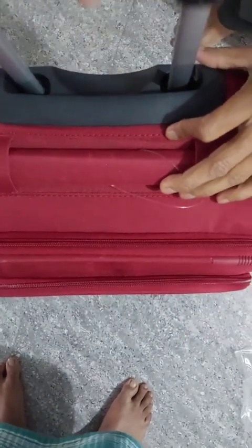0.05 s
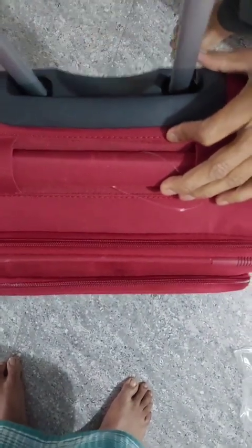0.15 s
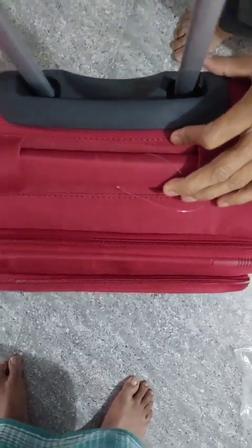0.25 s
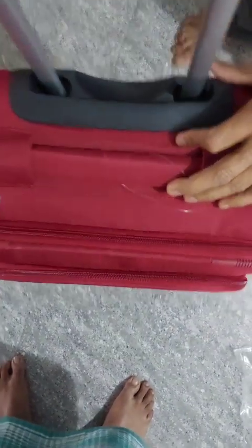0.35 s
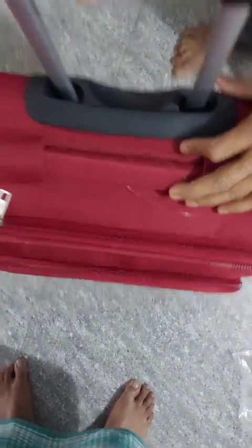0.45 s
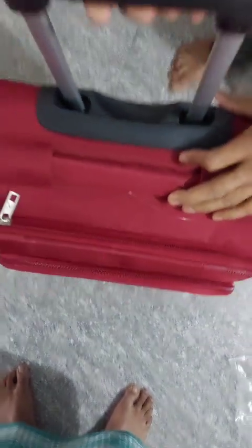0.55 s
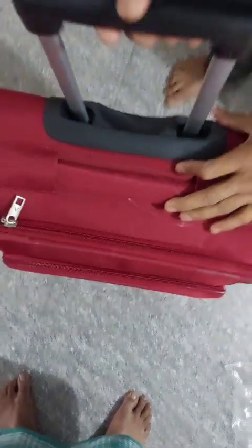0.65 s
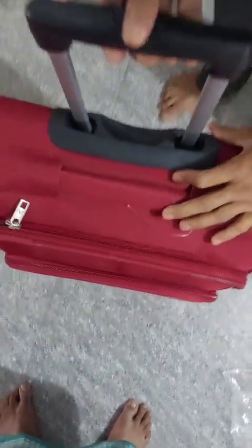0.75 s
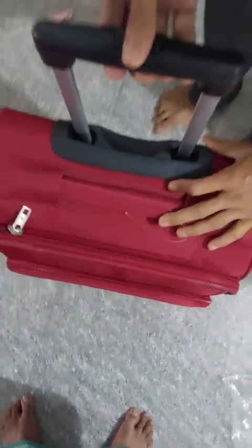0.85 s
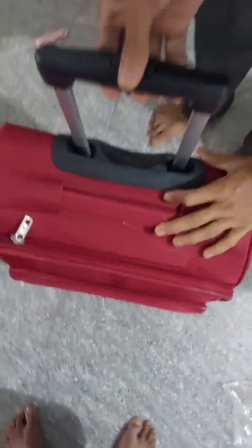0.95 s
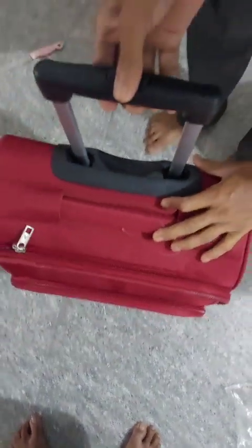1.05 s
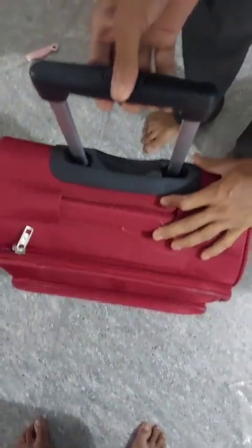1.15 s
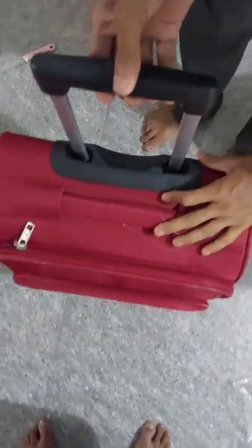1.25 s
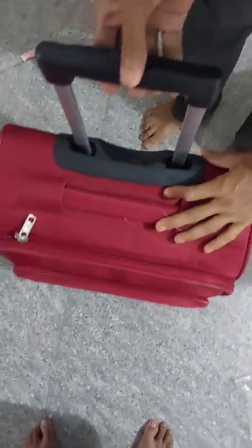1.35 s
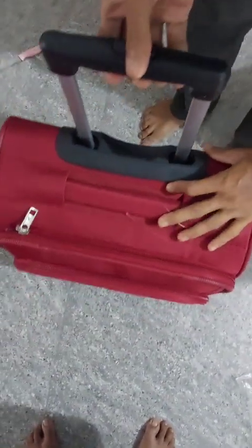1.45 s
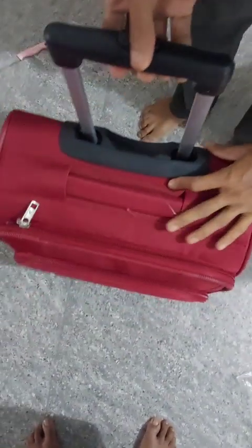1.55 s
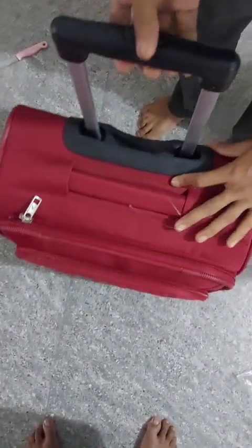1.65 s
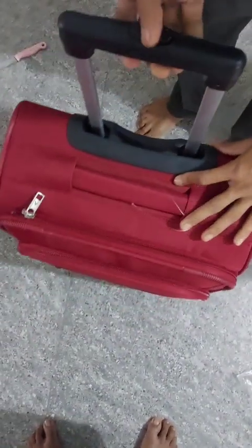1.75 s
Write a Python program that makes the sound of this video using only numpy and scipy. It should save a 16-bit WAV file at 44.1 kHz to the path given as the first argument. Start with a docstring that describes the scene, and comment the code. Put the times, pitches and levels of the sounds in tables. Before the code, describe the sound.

A suitcase's telescopic handle is pulled up with a loud metal clack and a locking snap.

```python
"""Suitcase handle pulled up

Close by in a small hard-floored room, the telescopic handle of a soft suitcase is drawn out.
The tubes grind, clack against their first stop and jolt the hollow case, then slide on
until the locking pins snap home. A zip pull tinkles and the fabric rustles as the case is tilted.
Every hit is a short noise crack with room echo; tubes, pins, shell and zip also ring."""
import sys
import numpy as np
from scipy import signal
from scipy.fft import rfft, irfft, next_fast_len
from scipy.io import wavfile
from scipy.ndimage import uniform_filter1d

SR = 44100
rng = np.random.default_rng(int(sys.argv[2]) if len(sys.argv) > 2 else 0)


def unload_wav(signal):
    """Save mono or channel-first audio to the path in sys.argv[1] as 16-bit WAV at rate SR, clipped to [-1, 1]."""
    wavfile.write(
        sys.argv[1],
        SR,
        np.round(np.clip(np.atleast_2d(signal).T, -1, 1) * 32767).astype(np.int16),
    )


N = 79380
TIME = np.arange(N) / SR
SIZE = next_fast_len(2 * N)
FREQS = np.maximum(np.arange(SIZE // 2 + 1) * SR / SIZE, 1)

# The hits. Each row: start in seconds, level in dB, brightness in dB per octave.
TUBE_HITS = [(0.001, -32, 0.5), (0.022, -47, 1), (0.108, -49, -2), (0.2128, -25, -0.5),
             (0.2173, -15, -0.06), (0.2215, -21.5, -1), (0.2315, -27, -1), (0.2432, -28.5, 0.5),
             (0.2472, -25, 2), (0.288, -59, 1.5)]  # tubes knocking in their guides
PANEL_HITS = [(0.005, -42.5, -1), (0.05, -46, -6.5), (0.36, -51.5, -9), (0.83, -43, 3), (1.19, -61, -7.5)]  # the back panel booming after the knocks
CASE_HITS = [(0.022, -48.5, -3), (0.231, -27.5, 2), (0.2455, -27.5, 2), (0.265, -38.5, -4.5),
             (0.318, -47.5, -5)]  # jolts of the case body
ZIP_HITS = [(0.325, -60, -11), (0.372, -62.5, 4), (0.44, -63, -7), (1.157, -76.5, -9.5), (1.3, -57.5, -3.5),
            (1.425, -71, 2)]  # the pull swinging against its slider
LOCK_HITS = [(0.8172, -21.5, 1), (0.8196, -22.5, 0.3), (0.8225, -30, -4.5)]  # pins dropping into their holes
# A pin touching the tube wall. Each row: start in seconds, level in dB, pitch in Hz.
PIN_TAPS = [(0.2096, -38, 2970), (0.696, -51.5, 4053), (1.199, -72, 3260)]

# EQ of each crack and noise bed. Each row: frequency in Hz, gain in dB.
TUBE_EQ = [(50, -37), (200, -17.5), (390, -20), (520, -11), (680, -22.5), (1100, -11.5), (1300, -12),
           (1900, 0.5), (2700, -3), (3600, -8), (5000, -5.5), (6000, -10), (7400, -5), (9000, -14.5),
           (15000, -20)]
PANEL_EQ = [(70, -29), (160, -8), (240, 3), (330, -10), (600, -21), (3000, -50)]
CASE_EQ = [(30, -40.5), (75, -6), (200, -5.5), (500, -8.5), (690, 3), (900, -8.5), (1150, -7.5),
           (2000, -26)]
ZIP_EQ = [(2500, -15.5), (4800, -15), (6500, -39), (8500, 5.5), (10500, -10), (13500, 13), (16000, -11)]
LOCK_EQ = [(100, -58.5), (240, -14), (340, -28), (415, -10), (520, -22), (800, -10), (1080, -25.5),
           (1300, -7.5), (1750, -4), (2150, 1.5), (3000, -9), (4000, -14), (5300, -7), (7500, -15),
           (15000, -24)]
FABRIC_EQ = [(60, -6), (220, 10.5), (600, 1), (1500, 2.5), (2600, -13.5), (4200, 2), (7800, 2), (10000, -5),
             (14000, 4), (16000, -5)]
AIR_EQ = [(25, -17.5), (70, 3), (150, -3.5), (300, -6), (600, -11.5), (1100, -14.5), (2000, -23),
          (5000, -31), (16000, -25.5)]
# EQ of a pin's tap. Each row: multiple of its pitch, gain in dB.
TAP_EQ = [(.1, -32), (.85, -6.5), (1, 2.5), (1.2, -12), (1.55, -5.5), (3, -29.5)]

# Ringing modes; close pairs beat. Each row: frequency in Hz, level in dB, T60 in seconds.
TUBE_RING = [(1790, -3, .42), (1951, 0, .3), (2240, -3, .25), (2503, 0, .2), (2790, 0, .2), (3125, -6, .24),
             (4718, -6, .2), (4865, -4, .22), (4998, -4, .24)]
CASE_RING = [(81, -9, .25), (187, -2, .25), (652, 0, .22), (747, -1, .16), (1184, -7, .15)]
ZIP_RING = [(7950, -3, .22), (8935, -2, .2), (13240, -1, .2), (14530, 0, .2), (15395, -1, .2)]
LOCK_RING = [(420, -19, .18), (754, -18, .22), (1556, -9, .28), (1943, -4, .16), (2094, 0, .2),
             (2140, -10, .6), (2160, -12, .55), (2188, 0, .2), (2562, -7, .17), (2955, -10, .22),
             (4877, -10, .22), (5250, -7, .2)]
# Hollow resonances of the sliding tubes. Each row: centre in Hz, width in Hz, gain in dB.
SLIDE_PEAKS = [(302, 117, 2), (976, 360, 0), (1930, 200, -4)]

# Fader moves for the rubbing layers. Each row: time in seconds, level in dB.
GRIND_FADER = [(0, -47), (0.08, -53.5), (0.202, -59.5), (0.211, -39), (0.23, -110)]
SLIDE_FADER = [(0, -61.5), (0.15, -63.5), (0.55, -74), (0.62, -63.5), (0.72, -61.5), (0.81, -67),
               (0.86, -79.5)]
FABRIC_FADER = [(0, -57), (0.2, -56), (0.4, -66), (0.55, -75.5), (1.13, -105), (1.19, -74), (1.28, -77.5),
                (1.49, -81.5), (1.57, -63.5), (1.68, -67.5), (1.8, -72.5)]

# Decay of the room. Each row: frequency in Hz, T60 in seconds.
ROOM_DECAY = [(100, .36), (500, 0.45), (2000, 0.36), (5000, 0.3), (9000, 0.2), (15000, 0.28)]
# Lean of the direct sound before panning. Each row: frequency in Hz, left minus right in dB.
STEREO_LEAN = [(200, 0), (650, -8.5), (1900, 4), (5000, -5), (9000, 3.5), (13000, -12.5)]

DIFFUSE_MONO_HZ, DIRECT_MONO_HZ = 450, 2060  # left and right are alike below these


def undb(db):
    """Decibels to gain."""
    return 10 ** (np.asarray(db) / 20)


def unit(x):
    """Scale to an average energy of one per channel."""
    return x / np.sqrt(np.mean(np.sum(x ** 2, axis=-1)))


def curve(points):
    """Draw a curve through (Hz, value) points over log frequency."""
    hz, values = np.array(points).T
    return np.interp(np.log(FREQS), np.log(hz), values)


def fader(points):
    """Gain over time from (seconds, dB) points."""
    return undb(np.interp(TIME, *np.array(points).T))


def decay(t60):
    """Exponential fade, down 60 dB after t60 seconds."""
    return np.exp(-np.log(1000) * TIME / max(t60, 1e-4))


def drift(rate_hz):
    """Random wander with a spread near one."""
    return np.interp(TIME * rate_hz, np.arange(N), rng.standard_normal(N))


def friction(rate_hz, spread_db):
    """Uneven grip: a gain that catches and slips at random."""
    return undb(spread_db * drift(rate_hz))


def equalise(x, eq_db):
    """Minimum-phase EQ, so nothing rings ahead of an attack."""
    cepstrum = irfft(np.log(undb(eq_db)), SIZE)
    cepstrum[1:SIZE // 2] *= 2
    cepstrum[SIZE // 2 + 1:] = 0
    return irfft(rfft(x, SIZE) * np.exp(rfft(cepstrum)), SIZE)[..., :N]


def noise(mono_hz=DIFFUSE_MONO_HZ):
    """Stereo white noise, narrow in the bass and wide in the treble."""
    mid, side = rfft(rng.standard_normal((2, SIZE)))
    alike = .92 / (1 + (FREQS / mono_hz) ** 4)
    spectrum = mid * np.sqrt(1 + alike) + np.array([[1], [-1]]) * side * np.sqrt(1 - alike)
    return irfft(spectrum, SIZE)[:, :N]


def wash(eq_db):
    """Steady coloured noise at an rms of one."""
    return unit(equalise(noise(), eq_db)) * np.sqrt(N)


def burst(envelope):
    """A brief rush of micro-impacts, evened out so that no broad band is missing."""
    spectrum = rfft(noise(DIRECT_MONO_HZ) * envelope, SIZE)
    power = uniform_filter1d(np.abs(spectrum) ** 2, size=2800, axis=1)
    return irfft(spectrum / np.sqrt(power + 1e-12), SIZE)[:, :N]


def ring(modes, jitter, waver_hz=90):
    """Dying modes waver in level and pitch as loose parts chatter; jitter is a share of the pitch."""
    out = 0
    for (hz, db, t60), (phase, apart) in zip(modes, rng.uniform(-0.91, 1, (len(modes), 2))):
        width = min(hz / DIFFUSE_MONO_HZ / 2, 1)  # higher modes sit wider
        phases = np.pi * (phase + np.array([[0], [apart]]) * width)
        cycles = hz * np.cumsum(1 + jitter * drift(waver_hz + 2 * jitter * hz)) / SR
        waver = friction(waver_hz, spread_db=3.5)
        out = out + undb(db) * unit(np.sin(2 * np.pi * cycles + phases) * decay(t60) * waver)
    return unit(out)


def room(gap_s=0.0027, build_s=0.01):
    """Diffuse echo off the walls: it builds quickly and the treble dies first."""
    spectrum, tail = rfft(noise(), SIZE), 0
    for hz, t60 in ROOM_DECAY:
        band = curve([(f, float(f == hz)) for f, _ in ROOM_DECAY])
        tail = tail + irfft(spectrum * band, SIZE)[:, :N] * decay(t60)
    return unit(tail * np.clip((TIME - gap_s) / build_s, 0, 1))


def place(x, pan_db, left_lag_s=.00024):
    """Place the direct sound: each band leans to one side, and the left arrives a touch late."""
    lean = undb((curve(STEREO_LEAN) + pan_db) / 2)
    gains = np.array([lean * np.exp(-2j * np.pi * FREQS * left_lag_s), 1 / lean])
    return irfft(rfft(x, SIZE) * gains, SIZE)[:, :N]


def strikes(hits, eq, modes, crack_t60, ring_db, room_db, pan_db, jitter=.0012):
    """Each contact grazes, cracks and sets the modes ringing; the crack echoes in the room."""
    cracks, rings = np.zeros((2, 2, N))
    eq_db = curve(eq)
    centre_hz = np.average(FREQS, weights=undb(eq_db) ** 2)
    octaves = np.clip(np.log2(FREQS / centre_hz), -2, 2)
    lead = int(.004 * SR)
    graze = undb(-10) * np.linspace(0, 1, lead) ** 3  # parts scrape just before they meet
    for start_s, db, brightness in hits:
        hardness = undb(db + 11)  # harder hits are shorter
        envelope = np.r_[graze, decay(crack_t60 / (1 + hardness))][:N]
        crack = unit(equalise(burst(envelope), eq_db + brightness * octaves))
        delay = ((0, 0), (int(start_s * SR), lead))
        cracks += undb(db) * np.pad(crack, delay)[:, lead:lead + N]
        if modes:
            tilted = [(hz, mode_db + brightness * np.interp(hz, FREQS, octaves), t60)
                      for hz, mode_db, t60 in modes]
            rings += undb(db + ring_db) * np.pad(ring(tilted, jitter), delay)[:, :N]
    echo = undb(room_db) * signal.fftconvolve(cracks, room(), axes=1)[:, :N]
    return (place(cracks + rings, pan_db) + echo) * np.sqrt(SR / 200)


def room_tone():
    """A quiet, bass-heavy bed of air."""
    return undb(-71) * wash(curve(AIR_EQ))


def edge_grind(centre_hz=3080, width_hz=1700):
    """Bare tube edges grate, metal on metal, in one bright band until they reach the stop."""
    band_db = -20 * np.log10(1 + (2 * (FREQS - centre_hz) / width_hz) ** 2)
    return wash(band_db) * fader(GRIND_FADER) * friction(rate_hz=450, spread_db=2.5)


def tube_slide():
    """The tubes rub in their guides: hollow resonances under a fine hiss."""
    peaks = sum(undb(db) / (1 + 2 * ((FREQS - hz) / width) ** 2) for hz, width, db in SLIDE_PEAKS)
    hollow = wash(20 * np.log10(peaks))
    hiss = undb(-2.5) * wash(curve([(500, -10.5), (3000, -7.5), (7000, -3.5), (16000, -2)]))
    return (hollow + hiss) * fader(SLIDE_FADER) * friction(rate_hz=58, spread_db=1)


def fabric_rustle():
    """The cloth of the case rustles as hand and tubes rub on it."""
    return wash(curve(FABRIC_EQ)) * fader(FABRIC_FADER) * friction(rate_hz=600, spread_db=1)


def tube_clacks():
    """The tubes knock in their guides and hit the stop: sharp cracks with a metal ring."""
    return strikes(TUBE_HITS, TUBE_EQ, TUBE_RING, crack_t60=0.019, ring_db=-10, room_db=-6, pan_db=-2.8)


def panel_booms():
    """The hollow back panel answers the knocks with a low, noisy boom."""
    return strikes(PANEL_HITS, PANEL_EQ, [], crack_t60=0.079, ring_db=0, room_db=-3.5, pan_db=0)


def case_thumps():
    """The case body takes the jolts and gives them their weight."""
    return strikes(CASE_HITS, CASE_EQ, CASE_RING,
                   crack_t60=0.0642, ring_db=-5, room_db=-9, pan_db=-1.5, jitter=.014)


def pin_ticks(ring_t60=.05):
    """A pin taps the tube wall, which pings at a pitch set by where it is touched."""
    out = 0
    for start_s, db, hz in PIN_TAPS:
        eq = [(hz * multiple, gain_db) for multiple, gain_db in TAP_EQ]
        out = out + strikes([(start_s, db, 0)], eq, [(hz, 0, ring_t60)],
                            crack_t60=0.015, ring_db=-1.5, room_db=-3.5, pan_db=1)
    return out


def zip_tinkles():
    """The zip pull swings against its slider with a thin, high shimmer."""
    return strikes(ZIP_HITS, ZIP_EQ, ZIP_RING,
                   crack_t60=0.097, ring_db=4, room_db=2.5, pan_db=4.5, jitter=.01)


def lock_snap():
    """The locking pins snap into their holes in one tight cluster and ring on."""
    return strikes(LOCK_HITS, LOCK_EQ, LOCK_RING, crack_t60=0.025, ring_db=-7, room_db=-3, pan_db=2)


def scene():
    """Rubbing layers and hits, mixed over the room tone."""
    rubbing = edge_grind() + tube_slide() + fabric_rustle()
    hits = tube_clacks() + panel_booms() + case_thumps() + pin_ticks() + zip_tinkles() + lock_snap()
    return room_tone() + rubbing + hits


def record(dry, top_hz=15750):
    """A steep low-pass trims the very top of the mix."""
    return signal.sosfilt(signal.ellip(10, .2, 70, top_hz, fs=SR, output="sos"), dry)


dry = scene()
out = record(dry)
unload_wav(out)
```